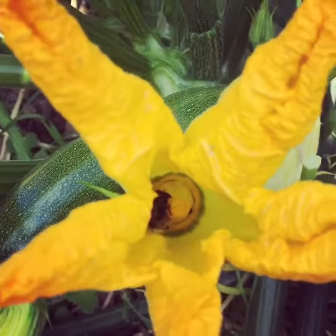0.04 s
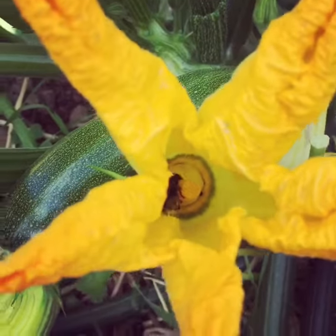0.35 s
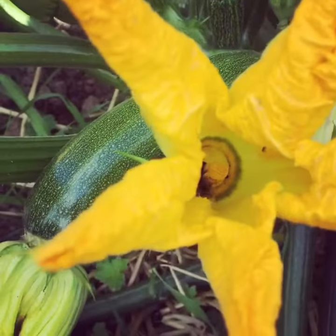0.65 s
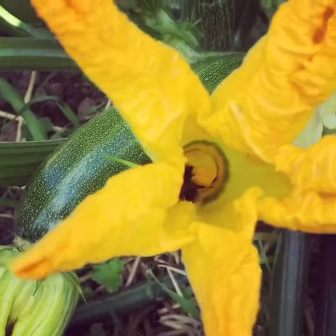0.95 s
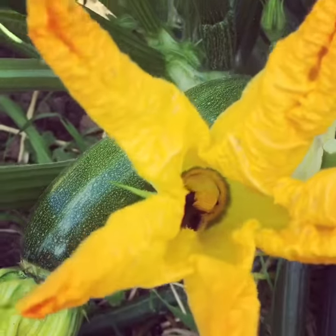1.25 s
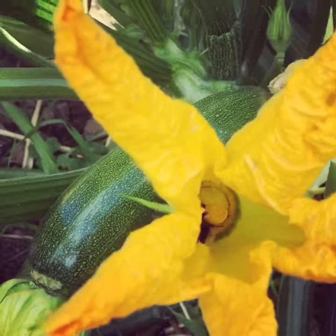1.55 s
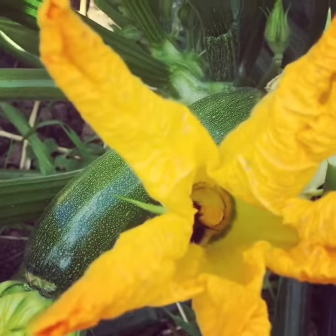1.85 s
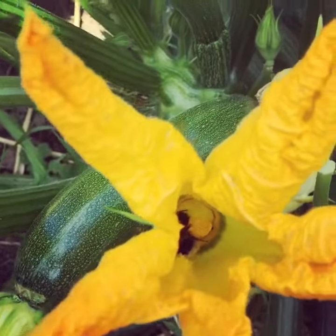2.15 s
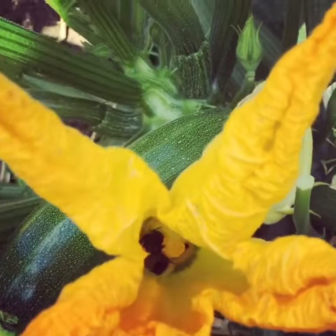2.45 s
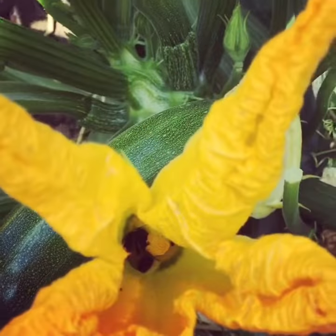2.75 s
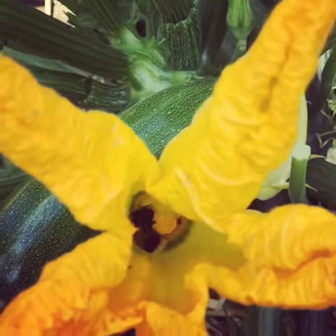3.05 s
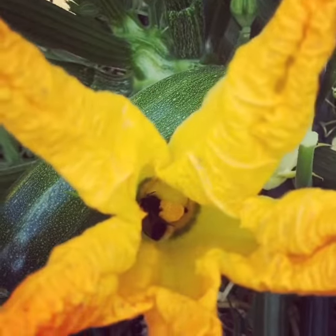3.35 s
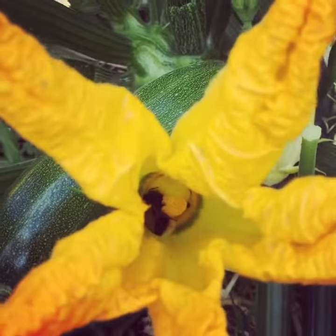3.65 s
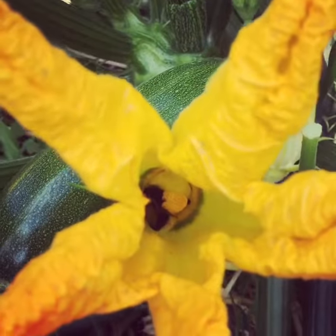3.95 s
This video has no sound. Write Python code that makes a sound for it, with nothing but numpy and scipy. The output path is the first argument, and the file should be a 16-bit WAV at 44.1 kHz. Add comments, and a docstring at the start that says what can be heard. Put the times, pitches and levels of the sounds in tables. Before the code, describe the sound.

Light wind buffets a hand-held microphone with low rumbling and soft thumps, strongest at the start and again near the end. Behind it lies the faint, even hush of a quiet garden.

```python
"""First you hear low, lumpy rumbling and soft thumps: light wind brushing a hand-held microphone.
It comes in short gusts that sound brighter when the air pushes harder. The thumps are single
swings of pressure from swirling air and handling. Behind them lies a quiet garden: an even hush
of leaves and distance, the faint hum of a far machine's turning shaft, two thin bird peeps
and a few tiny ticks of leaves touching."""
import sys
import numpy as np
from scipy import signal
from scipy.fft import rfft, irfft, next_fast_len
from scipy.io import wavfile
from scipy.ndimage import map_coordinates

SR = 44100
rng = np.random.default_rng(int(sys.argv[2]) if len(sys.argv) > 2 else 0)


def dump_mix(stems):
    """Bounce the given channels to the path in sys.argv[1] as a 16-bit WAV at rate SR."""
    frames = np.atleast_2d(stems).T  # one column per channel
    limited = np.clip(frames, -1, 1)  # hard clip at full scale
    pcm = np.round(limited * 32767).astype(np.int16)
    wavfile.write(sys.argv[1], SR, pcm)


N = 176400  # 4 seconds


# gusts hitting the microphone: start t/s, length/s, level/dB
GUSTS = [(0.0, 0.014, -35), (0.038, 0.025, -33.5), (0.075, 0.053, -32.5), (0.147, 0.0091, -35),
         (0.172, 0.01, -33), (0.195, 0.0088, -31.5), (0.215, 0.031, -34), (0.270, 0.0075, -38),
         (0.299, 0.027, -32.5), (0.378, 0.013, -54), (0.501, 0.029, -40.5), (0.562, 0.097, -49.5),
         (0.678, .1, -52.5), (0.918, 0.08, -51.5), (1.052, 0.035, -54), (1.121, 0.095, -49.5),
         (1.259, 0.039, -51), (1.314, 0.065, -50.5), (1.417, 0.018, -51.5), (1.537, 0.073, -46.5),
         (1.683, 0.085, -45), (1.862, 0.013, -50), (1.945, 0.065, -46.5), (2.078, 0.26, -52.5),
         (2.36, 0.51, -63), (2.92, 0.043, -48), (2.998, 0.073, -42), (3.156, 0.043, -42),
         (3.215, 0.23, -47.5), (3.746, 0.047, -55), (3.827, 0.047, -48.5), (3.904, 0.075, -57)]
# the tone of the wind's three noises, lowest first: f/Hz, relative level/dB
RUMBLE = [(20, -7), (35, -11.5), (55, -2), (90, 1), (130, -9.5), (190, -14), (270, -35), (400, -61),
          (1500, -120)]
FLUTTER = [(70, -23), (140, 0.5), (230, -0.5), (300, -12), (370, -21.5), (480, -31.5), (900, -73.5),
           (2000, -120)]
RASP = [(180, -22), (290, -1), (380, -1.5), (490, -7.5), (570, -24.5), (700, -19), (1300, -73),
        (3000, -120)]

def wind():
    """Air pushing on the microphone rumbles. As it pushes harder, the higher noises grow fastest."""
    calm_db, strong_gust_db, lump_db = -60.5, -31.5, 2
    flutter_db, rasp_db = -37.5, -51  # levels in a strong gust
    flutter_growth, rasp_growth = 1.73, 2.37  # dB gained for each dB of wind
    power = amp(calm_db) ** 2 + sum(amp(db) ** 2 * gust(s, length) for s, length, db in GUSTS)
    strength_db = 10 * np.log10(power) + lump_db * wobble(29)
    over_db = strength_db - strong_gust_db
    rumble = amp(strength_db) * noise(RUMBLE)
    flutter = amp(flutter_db + flutter_growth * over_db) * noise(FLUTTER)
    rasp = amp(rasp_db + rasp_growth * over_db) * noise(RASP)
    return rumble + flutter + rasp


def gust(start, length, rise_s=0.006, fall_s=0.0077):
    """The power of one puff of air: it rises quickly, holds and drops away."""
    t = clock() - start
    rise = np.minimum(t, 0) / rise_s
    fall = np.maximum(t - length, 0) / fall_s
    return np.exp(-rise ** 2 - fall ** 2)


# bumps of pressure on the microphone: t/s, level/dB, f/Hz
THUMPS = [(0.014, -28.5, 61.5), (0.036, -33.5, 232), (0.046, -23, 100), (0.061, -30, 240),
          (0.092, -24.5, 180), (0.12, -18.5, 81), (0.156, -29, 135), (0.192, -21, 320), (0.197, -14.5, 132),
          (0.222, -25.5, 151), (0.247, -23, 127), (0.275, -26.5, 163), (0.31, -28.5, 115),
          (0.335, -24.5, 63.4), (0.519, -27.5, 118), (0.562, -37.5, 147), (0.811, -37.5, 69.4),
          (0.868, -39, 79), (1.27, -33.5, 69), (1.348, -33.5, 71.4), (1.374, -34, 74.5), (1.553, -29, 93),
          (1.601, -32, 68), (1.729, -28.5, 135), (1.738, -22, 92.5), (2.101, -37, 66), (2.259, -37, 89),
          (2.984, -22, 153), (3.039, -25, 193), (3.046, -21, 86), (3.131, -29.5, 167), (3.166, -36, 151),
          (3.196, -33.5, 115), (3.255, -39.5, 150), (3.302, -32, 100), (3.364, -37.5, 97), (3.391, -31, 91),
          (3.436, -42, 145), (3.468, -36, 105), (3.874, -31, 49.4)]

def thumps(fade_cycles=0.23, muffle_hz=586):
    """Each thump is one swing of pressure, out and back, muffled by the microphone's cover."""
    swing = lambda cycles: np.sin(2 * np.pi * cycles) / np.cosh(np.clip(cycles / fade_cycles, -20, 20))
    pushes = sum(amp(db) * swing(hz * (clock() - s)) for s, db, hz in THUMPS)
    return filtered(pushes, lambda hz: 1 / (1 + (hz / muffle_hz) ** 10))


# the tone of the hush, the low murmur and the swells: f/Hz, relative level/dB
HUSH_TONE = [(200, -22), (350, -14.5), (600, -6), (780, -7), (1000, -5), (1400, -8.5), (2000, -11),
             (3000, -15.5), (4200, -17), (4900, -21), (5500, -19), (7500, -23), (9400, -23), (10400, -28.5),
             (11400, -25), (15500, -30.5)]
MURMUR_TONE = [(25, -20), (45, 14.5), (70, 9.5), (130, -18), (250, -7), (340, -14.5), (600, -19.5),
               (1200, -48)]
SWELL_TONE = [(450, -35), (700, -4), (1020, 4.5), (1300, -7), (1650, -2.5), (3500, -21.5), (8000, -48)]
# how loud the hush is, before lift_db is added: t/s, level/dB
HUSH_LEVEL = [(0.03, -67.5), (0.54, -68.5), (0.8, -69.5), (1.57, -69), (3.3, -69.5), (3.9, -69.5)]
# moments when the hush swells: t/s, half-width/s, level/dB
SWELLS = [(0.38, 0.39, -69.5), (1.6, 0.27, -74.5)]

def garden(lift_db=0.5, murmur_db=-59):
    """The hush of leaves and distance wavers, swells twice and eases, over a low murmur of air."""
    waver_db = 0.65 * wobble(12)
    hush = amp(curve(HUSH_LEVEL) + lift_db + waver_db) * noise(HUSH_TONE)
    murmur = amp(murmur_db) * noise(MURMUR_TONE)
    swelling = sum(amp(db) * swell(s, half_s) for s, half_s, db in SWELLS)
    return hush + murmur + swelling * noise(SWELL_TONE)


# the tones in the machine's hum: vibrations per turn of the shaft, level/dB
HUM = {5: -65, 6: -79.5, 10: -90.5, 13: -81, 15: -84.5, 16: -82.5, 18: -85, 20: -83, 30: -89, 37: -86, 42:
       -89, 56: -90.5}

def machine(shaft_hz=45.74, speed_drift=0.001616, waver_db=1.5):
    """A far, turning shaft hums with many tones, each wavering on its way through the air."""
    turns = np.cumsum(shaft_hz * (1 + speed_drift * wobble(2.907))) / SR
    hum = np.zeros(N)
    for per_turn, db in HUM.items():
        height = np.sqrt(2) * amp(db + waver_db * wobble(3.96))
        hum += height * np.sin(2 * np.pi * (per_turn * turns + rng.random()))
    return hum


# a bird's peeps: t/s, level/dB
PEEPS = [(1.738, -72.5), (1.82, -79)]

def bird(lower_hz=4450, upper_hz=7900, upper_db=-12, half_s=0.019):
    """A far bird peeps, then again more softly: two high tones at once, slightly unsteady in pitch."""
    phase = 2 * np.pi * np.cumsum(1 + 0.0056 * wobble(200)) / SR
    voice = np.sin(lower_hz * phase) + amp(upper_db) * np.sin(upper_hz * phase)
    return voice * sum(amp(db) * swell(s, half_s) for s, db in PEEPS)


# leaves touching: t/s, level/dB, f/Hz
TICKS = [(0.445, -75, 5500), (0.521, -75, 6000), (3.408, -72, 7700), (3.435, -76.5, 6800)]

def leaves(fade_s=0.003, rustle_s=0.008, rustle_db=-13, width_octaves=0.28):
    """Leaves touch with tiny dry ticks: each is a snap of hiss inside a brief, softer rustle."""
    ticks = np.zeros(N)
    for s, db, centre_hz in TICKS:
        t = clock() - s
        snap = (t >= 0) * np.exp(-np.abs(t) / fade_s)
        rustle = amp(rustle_db) * swell(s, rustle_s)
        band = lambda hz: np.exp(-.5 * (np.log2((hz + 1) / centre_hz) / width_octaves) ** 2)
        hiss = unit(filtered(rng.standard_normal(N), band))
        ticks += amp(db) * (snap + rustle) * hiss
    return ticks


def amp(db):
    """Turn decibels into a number to multiply by."""
    return 10 ** (np.asarray(db) / 20)


def unit(x):
    """Scale a sound so that its average size (rms) is 1."""
    return x / np.sqrt(np.mean(x ** 2) + 1e-20)


def clock():
    """The time of every sample, in seconds."""
    return np.arange(N) / SR


def curve(rows):
    """Join (time, value) points with straight lines."""
    return np.interp(clock(), *np.transpose(rows))


def swell(s, half_s):
    """A bell-shaped rise and fall around the time s."""
    return np.exp(-.5 * ((clock() - s) / half_s) ** 2)


def wobble(per_second):
    """A smooth curve through this many random values each second."""
    return map_coordinates(rng.standard_normal(1024), [clock() * per_second], mode="mirror")


def filtered(x, response):
    """Turn each frequency in x up or down by response(hz)."""
    size = next_fast_len(N + SR // 2)
    return irfft(rfft(x, size) * response(np.fft.rfftfreq(size, 1 / SR)), size)[:N]


def noise(tone):
    """Noise of average size 1, shaped by rows of f/Hz, level/dB."""
    row_hz, row_db = np.transpose(tone)
    hz = np.fft.rfftfreq(N, 1 / SR)
    gain = amp(np.interp(np.log(hz + 1), np.log(row_hz), row_db))
    return unit(irfft(rfft(rng.standard_normal(N)) * gain, N))


def scene():
    """All the sounds add up at one microphone."""
    return (wind() + thumps() + garden() + machine() + bird() + leaves())[None]


def record(dry):
    """The microphone weakens the deepest bass and loses the very highest treble."""
    low_cut_hz, top_hz = 42, 15720
    bass_cut = signal.butter(4, low_cut_hz, "highpass", fs=SR, output="sos")
    thinned = signal.sosfilt(bass_cut, dry[0])
    return filtered(thinned, lambda hz: hz < top_hz)[None]


dry = scene()
out = record(dry)
dump_mix(out)
```